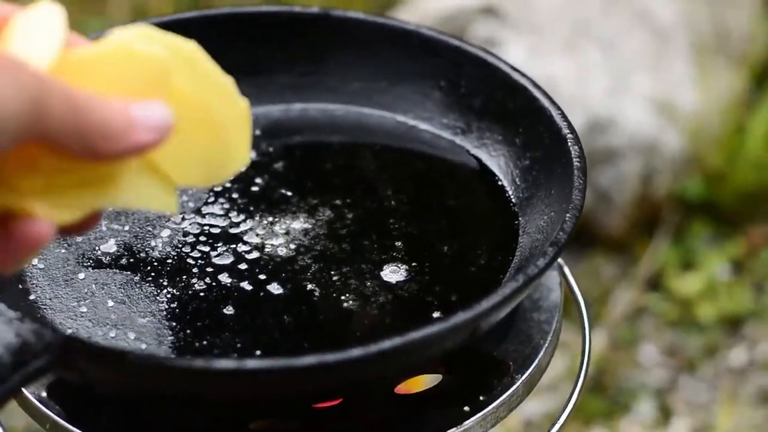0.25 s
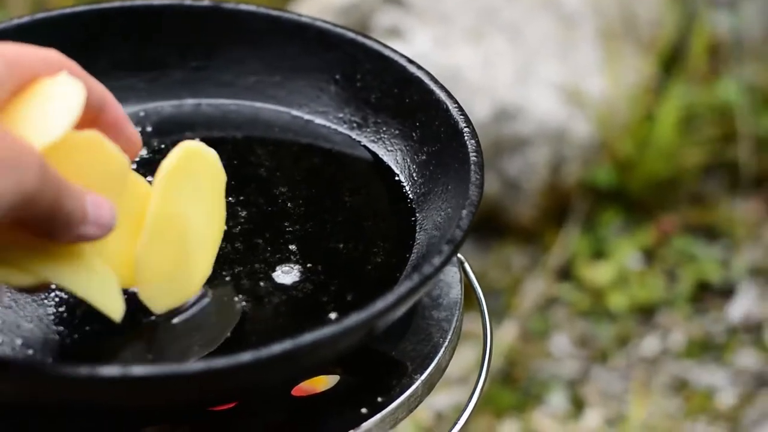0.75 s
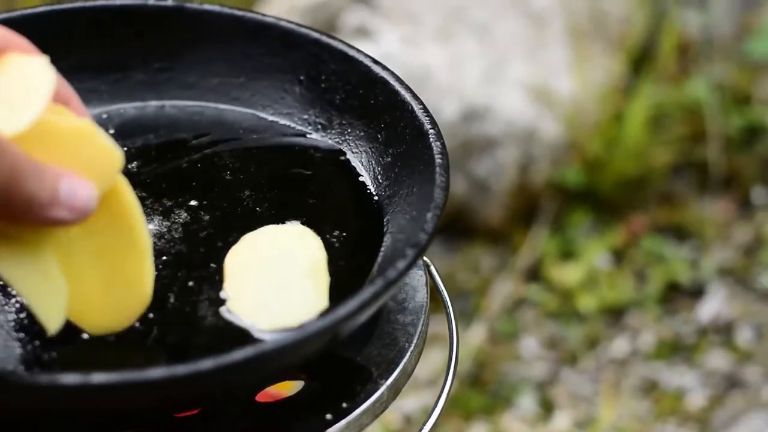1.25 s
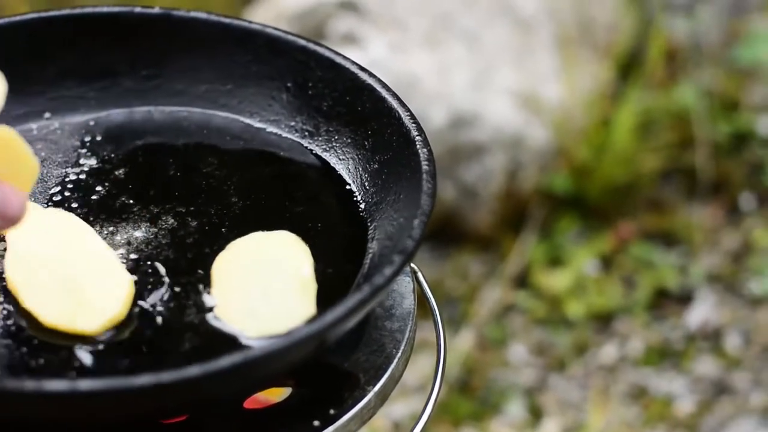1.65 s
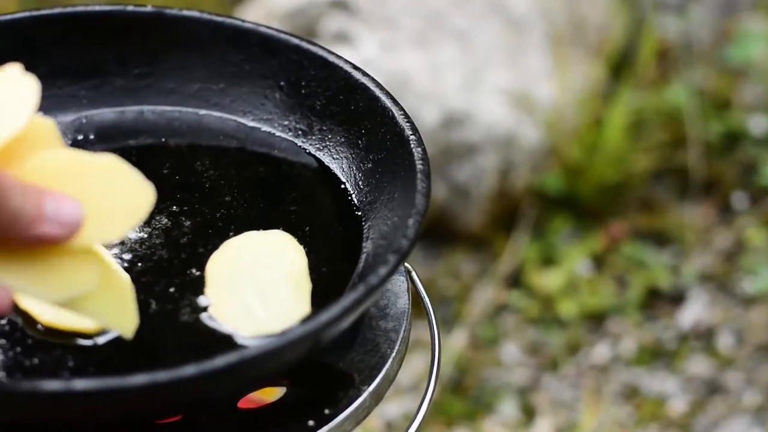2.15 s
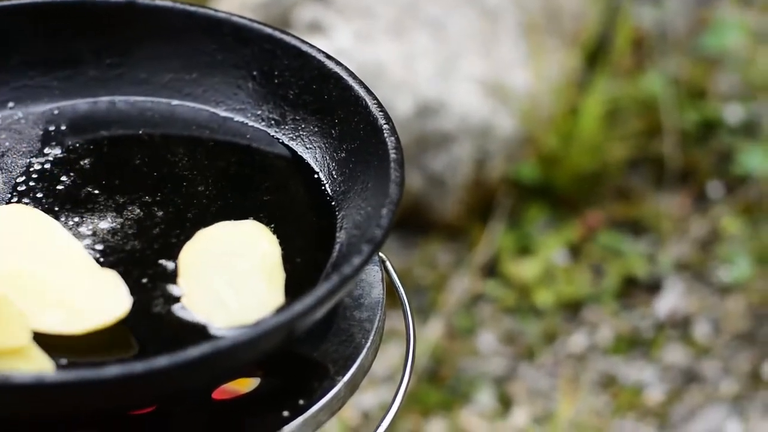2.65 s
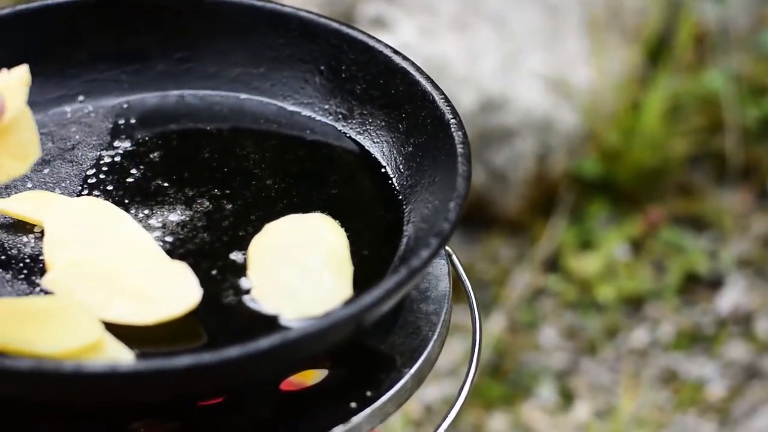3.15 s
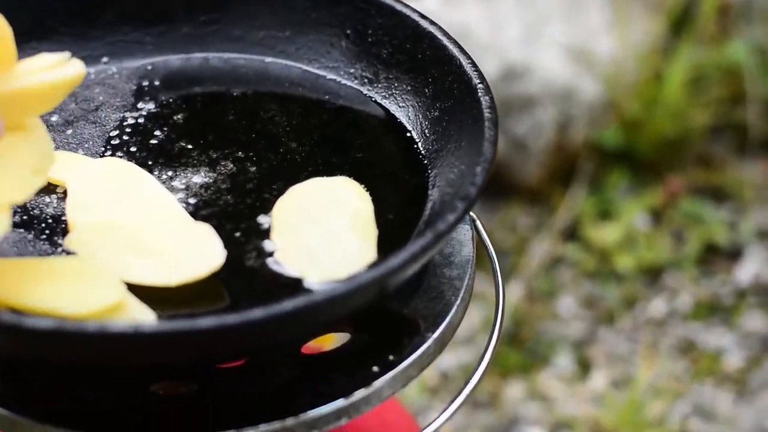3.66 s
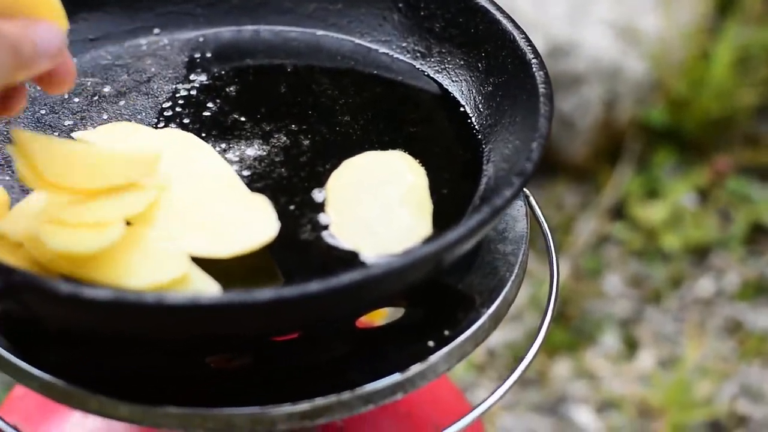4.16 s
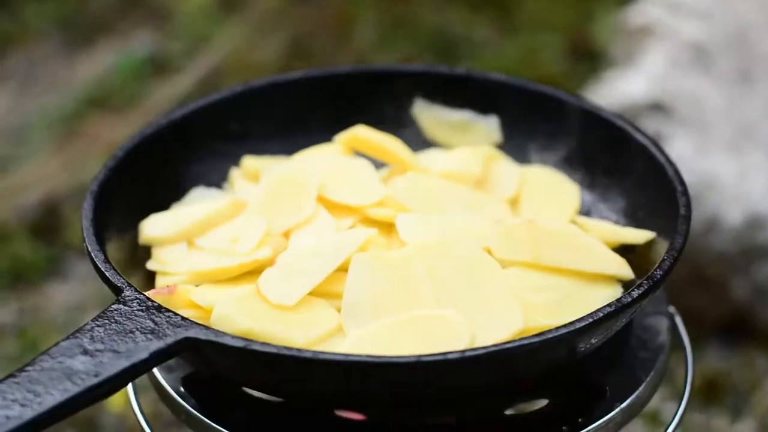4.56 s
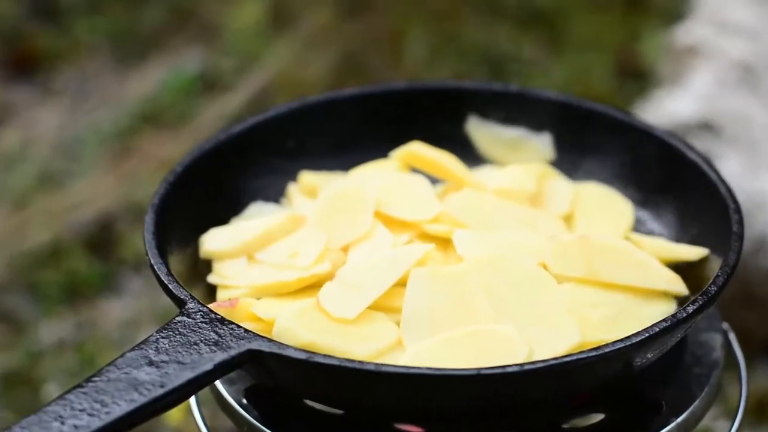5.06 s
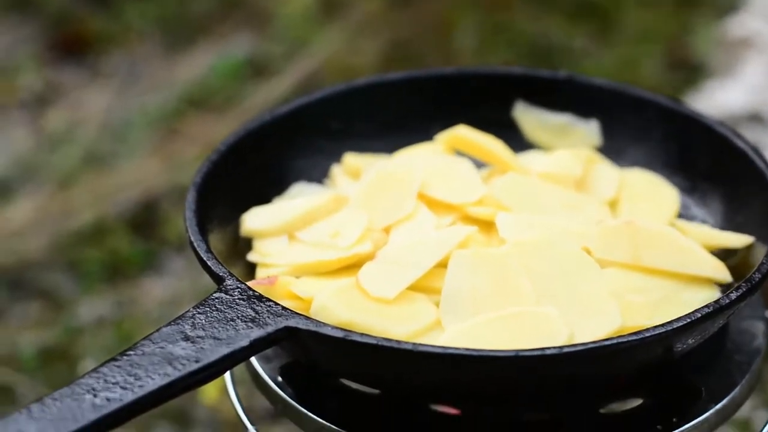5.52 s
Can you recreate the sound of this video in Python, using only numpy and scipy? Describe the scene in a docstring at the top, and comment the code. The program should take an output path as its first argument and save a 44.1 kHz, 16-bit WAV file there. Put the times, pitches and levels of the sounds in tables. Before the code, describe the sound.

A portable gas burner runs outdoors under an iron pan, close to the microphone, in a dry, fairly narrow stereo image leaning slightly right. From 0 s there is a soft roar and bright hiss; the level drops sharply at about 0.04 s and eases back within a few tenths. Narrow, airy whistles around 3 to 11 kHz swell and fade unevenly, dulling near 0.8 s, brighter around 1.3 s, weaker near 2.4 s, strongest around 3.9 s. One very faint bubble tone comes at 1.7 s. At about 4.37 s a fuller, wider burner roar enters abruptly, overlapping the close hiss until that stops at 4.75 s. With it comes dense, fine sizzling of potato slices in oil, with small random crackles and sharp spits, clustered around 4.45 to 4.6 s, 5.0 to 5.5 s and 5.7 s. Small bubbles tick near 4.9 s; a low plop sounds at 5.4 s.

```python
"""A portable gas burner hisses and roars softly outdoors, close to the microphone, under an iron pan.
The gas jet rings the burner's narrow passages, and their high tones swell as the microphone drifts.
The level dips briefly at the start. Late on, a wider sound of the full pan overlaps the close one:
potato slices fizz in the oil, bubbles pop and water drops spit. Flame and fizz are shaped noise and clicks."""
import sys
import numpy as np
from scipy import signal
from scipy.fft import rfft, irfft
from scipy.io import wavfile

SR = 44100
rng = np.random.default_rng(int(sys.argv[2]) if len(sys.argv) > 2 else 0)


def master_out(mix):
    """Clip the mix to full scale and print it as 16-bit PCM to the path in sys.argv[1]."""
    frames = np.transpose(np.atleast_2d(mix))
    ceiling = np.clip(frames, -1, 1)
    pcm = np.round(ceiling * 32767).astype(np.int16)
    wavfile.write(sys.argv[1], SR, pcm)


N = 255339  # length in samples

# when the wider sound of the full pan comes in, and how long it takes to rise
WIDE_START_S, WIDE_ATTACK_S = 4.365, 0.009

# Flame roar and jet hiss close beside the burner, before drift and dip.
# Each row: frequency in Hz, density in dB per Hz.
CLOSE_ROAR = [(22, -128), (55, -105), (125, -91.5), (190, -89), (900, -85.5), (1750, -88), (2200, -84.5),
              (2650, -90), (3700, -94), (4500, -93), (6550, -99), (8000, -95.5), (13200, -99),
              (15700, -93.5)]
# Fainter resonances of the burner, close up, before drift and dip.
# Each row: frequency in Hz, width in Hz, peak density in dB per Hz.
CLOSE_RESONANCES = [(3956, 130, -91.5), (4970, 170, -90), (6850, 150, -87.5), (7480, 260, -87.5),
                    (8100, 560, -90), (10000, 180, -89), (11700, 240, -96), (12600, 370, -99),
                    (14950, 450, -103)]
# Burner tones that swell and fade.
# Each row: frequency in Hz, width in Hz, level relative to its group in dB, group number from 0.
WHISTLES = [(2740, 235, -1, 0), (2994, 150, 0, 0), (3420, 120, 0, 5), (5580, 195, -1, 1), (5916, 49, -5, 1),
            (6138, 110, -4, 2), (6320, 93, -11, 2), (9560, 120, 17.5, 3), (9380, 180, 15.5, 3),
            (10630, 150, 5, 4), (11060, 150, 10, 4)]


def close_burner():
    """Flame roar plus the jet's turbulence ringing in the burner; the whistles swell in groups."""
    flame = noise(spectrum(CLOSE_ROAR)) * flutter(rate_hz=26, depth_db=0.6)
    # the fainter resonances rise a little with the high whistles
    ring = noise(resonances(CLOSE_RESONANCES)) * evened(treble_swell()) ** 0.38
    whistles = np.zeros(N)
    for group, swell in enumerate(whistle_swells()):
        modes = [row for row in WHISTLES if round(row[3]) == group]
        tones = evened(noise(resonances(modes)))
        whistles += swell * tones * flutter(rate_hz=27, depth_db=0.88)
    return (drift(flame + ring) + gain_of(0.4) * whistles) * close_level()


# The swell that the whistles share, beside the burner.
# Each row: time in seconds, level in dB.
TREBLE_SWELL = [(0.3, -2.5), (0.78, -6.5), (0.86, -3.5), (1.02, -2), (1.26, 2), (1.58, 0.5), (1.66, 2),
                (1.82, -0.8), (2.14, -1.3), (2.38, -4.5), (2.54, 0.7), (3.02, -2.0), (3.26, 1.9), (3.42, 1),
                (3.9, 4), (4.36, 1)]


def treble_swell():
    """Gain of the shared swell at every sample, in straight dB lines between the points."""
    seconds, db = np.transpose(TREBLE_SWELL)
    return gain_of(np.interp(np.arange(N) / SR, seconds, db))


# How each group of whistles sounds at the microphone, before the shared swell, flares and final trim.
# Each row: level at the pivot time in dB, response in dB per dB of the shared swell, trend in dB per second.
WHISTLE_GROUPS = [(-50.9, 0.03, 0.5), (-58.2, 0.35, -0.3), (-55.5, 1.4, 0.56), (-57.3, 0.93, -0.4),
                  (-71, 0.74, -0.2), (-58.6, 0.1, -0.1)]
# Moments when one group flares up or sinks by itself.
# Each row: centre in seconds, half length in seconds, change in dB, group number from 0.
WHISTLE_FLARES = [(0.15, 0.25, 6, 2), (0.45, 0.2, 8, 4), (0.64, 0.23, 7.5, 1), (0.7, 0.4, -4, 5),
                  (1.33, 0.15, 4, 5), (1.5, 0.45, 10, 4), (2.05, 0.12, 7, 4), (2.722, 0.18, 10.5, 4),
                  (3.25, 0.25, 3.5, 3), (3.95, 0.5, 12, 4)]


def whistle_swells(trend_pivot_s=2.3):
    """Gain of each group: one shared swell, followed more or less closely, a trend and single flares."""
    t = np.arange(N) / SR - trend_pivot_s
    treble = treble_swell()
    swells = [gain_of(db + trend * t) * treble ** follow for db, follow, trend in WHISTLE_GROUPS]
    for centre_s, half_length_s, db, group in WHISTLE_FLARES:
        flare = gain_of(db * bump(centre_s, half_length_s))
        swells[round(group)] = swells[round(group)] * flare
    return swells


def drift(x, depth_db=2.0, patch_hz=260, patch_s=0.048):
    """As the microphone moves, echoes from pan and stove reinforce shifting patches of the treble."""
    hz, seconds, cells = signal.stft(x, SR, nperseg=1024, noverlap=768)
    # random field over frequency and time, smoothed to the size of one patch
    across = np.fft.fftfreq(len(hz), hz[1])[:, None]
    along = np.fft.fftfreq(len(seconds), seconds[1])
    smooth = np.exp(-(across * patch_hz * np.pi) ** 2 - (along * patch_s * np.pi) ** 2)
    rough = rng.standard_normal(cells.shape)
    field = evened(np.fft.ifft2(np.fft.fft2(rough) * smooth).real)
    # short waves shift most: the full depth is reached from 10 kHz up
    share = np.minimum(hz[:, None] / 10000, 1) ** 1.1
    cells = cells * gain_of(depth_db * field * share)
    return signal.istft(cells, SR, nperseg=1024, noverlap=768)[1][:N]


def close_level(dip_s=0.0435, dip_db=-24.5, recovery_s=0.163, sink_db=-2, end_s=4.735, release_s=0.02):
    """Gain of the close sound: an abrupt dip that eases back, a hold, a slight sinking, a quick release."""
    dip = dip_db * bump(dip_s, recovery_s) * ramp(dip_s, 0.001)
    sink = sink_db * ramp(WIDE_START_S, end_s - WIDE_START_S)
    return gain_of(dip + sink) * (1 - ramp(end_s, release_s))


# Flame roar under the full pan, heard from farther off, before the wider sound's level.
# Each row: frequency in Hz, density in dB per Hz.
WIDE_ROAR = [(22, -112), (60, -95.5), (125, -84), (270, -85), (400, -86), (900, -81), (1700, -81.5),
             (2500, -82), (3700, -88), (5300, -88), (6500, -91.5), (8200, -91.5), (12500, -90.5),
             (15700, -98)]
# Resonances heard from that distance, before the wider sound's level.
# Each row: frequency in Hz, width in Hz, peak density in dB per Hz.
WIDE_RESONANCES = [(275, 60, -85), (1200, 140, -82.5), (3070, 170, -78.5), (3420, 110, -86),
                   (5400, 160, -91), (6000, 155, -80.5), (6800, 85, -87), (7400, 150, -86),
                   (8100, 430, -91), (8750, 200, -95), (9600, 120, -83)]


def wide_burner():
    """From farther off the flame's turbulence is fuller, with its own steady resonances."""
    flame = noise(spectrum(WIDE_ROAR)) * flutter(rate_hz=34, depth_db=1.32)
    return (flame + noise(resonances(WIDE_RESONANCES))) * wide_level()


def wide_level(start_db=-1.6, rise_db_per_s=0.7):
    """Gain of the wider burner sound: a quick attack, then a slow rise."""
    since_start = np.arange(N) / SR - WIDE_START_S
    return gain_of(start_db + rise_db_per_s * since_start) * ramp(WIDE_START_S, WIDE_ATTACK_S)


# Colour of the tiny steam bubbles in the full pan.
# Each row: frequency in Hz, relative level in dB.
FIZZ_COLOUR = [(1500, -24), (4000, 1.5), (6500, 0.5), (8300, 8), (10300, -0.5), (13000, -4), (14600, 8),
               (16000, 6)]
# The largest water drops bursting in the oil; they stir the fizz and also snap by themselves.
# Each row: start of the snap in seconds, strength in dB (the snap peaks 4 dB above it).
LARGE_SPITS = [(4.455, -25), (4.5732, -27), (4.5899, -27), (4.6137, -24), (4.976, -29), (5.1349, -29),
               (5.1829, -30), (5.2918, -26.5), (5.4203, -29), (5.4964, -26), (5.6554, -32), (5.6824, -25),
               (5.697, -26)]


def sizzle(bubbles_per_s=3400, spread_db=4.5, fizz_db=-49, flurry_db=-24, flurry_s=0.039):
    """Thousands of tiny bubbles click open each second; the fizz boils up around each large spit."""
    # a few bubbles are much larger than the rest
    size = gain_of(spread_db * np.minimum(rng.exponential(1, N), 4))
    sign = rng.choice([-1, 1], N)
    opens = rng.random(N) < bubbles_per_s / SR
    clicks = size * sign * opens * flutter(rate_hz=54, depth_db=0.8)
    fizz = evened(irfft(rfft(clicks) * spectrum(FIZZ_COLOUR), N))
    # flurries follow the strength of their spit and add to the steady fizz as power
    flurries = sum(gain_of(db + flurry_db) ** 2 * bump(s, flurry_s) for s, db in LARGE_SPITS)
    return fizz * np.sqrt(gain_of(fizz_db) ** 2 + flurries) * ramp(WIDE_START_S, WIDE_ATTACK_S)


def spits(snap_hz=10500, scatter_s=0.001, scatter_db=-22, level_db=4.0):
    """Each bursting drop is a snap of a single cycle, scattered briefly by the pan wall."""
    out = np.zeros(N)
    t = np.arange(SR // 100) / SR
    for s, db in list(LARGE_SPITS) + small_spits():
        phase = 2 * np.pi * snap_hz * rng.uniform(0.99, 1.1) * t - np.pi
        snap = -phase * np.exp((1 - phase ** 2) / 2)
        bright_noise = evened(np.diff(rng.standard_normal(len(t) + 1)))
        scatter = bright_noise * np.exp(-t / scatter_s)
        add(out, s, gain_of(db + level_db) * (snap + gain_of(scatter_db) * scatter))
    return out


def small_spits(per_s=14, strength_db=-34, spread_db=2.0):
    """Smaller drops burst at random in the full pan: start in seconds, strength in dB."""
    chance = rng.random(N)
    db = strength_db + spread_db * rng.standard_normal(N)
    at = np.flatnonzero(chance < ramp(WIDE_START_S, WIDE_ATTACK_S) * per_s / SR)
    return list(zip(at / SR, db[at]))


# Larger bubbles and a plop from under the slices.
# Each row: centre in seconds, peak level in dB, pitch in Hz, length in seconds.
BUBBLES = [(1.709, -52, 1256, 0.027), (4.886, -32.5, 4100, 0.001), (4.9455, -35, 4700, 0.0013),
           (5.386, -47, 1310, .016), (5.3999, -39.5, 563, 0.0045), (5.4, -41, 298, 0.0058),
           (5.4215, -38, 5000, .0013)]


def bubbles():
    """Pockets of steam ring as they escape: short tones that swell and fade smoothly."""
    out = np.zeros(N)
    for s, db, hz, length in BUBBLES:
        t = np.arange(-2 * length, 2 * length, 1 / SR)
        envelope = np.exp(-(2 * t / length) ** 2)
        add(out, s + t[0], gain_of(db) * envelope * np.cos(2 * np.pi * hz * t))
    return out


def gain_of(db):
    """Decibels to amplitude."""
    return 10 ** (np.asarray(db) / 20)


def evened(x):
    """Scales to an rms of 1."""
    return x / np.sqrt(np.mean(x ** 2) + 1e-20)


def spectrum(points):
    """Gain at every frequency from (Hz, dB) points, joined along log frequency."""
    f, db = np.transpose(points)
    bins = np.fft.rfftfreq(N, 1 / SR)
    return gain_of(np.interp(np.log(bins + 1), np.log(f), db))


def resonances(modes):
    """Gain at every frequency of a set of steep-sided resonances, added as power."""
    f = np.fft.rfftfreq(N, 1 / SR)
    power = 0
    for hz, width, db, *_ in modes:
        peak = gain_of(db) / (1 + ((f - hz) / width) ** 2 * np.sqrt(2))
        power = power + peak ** 2
    return np.sqrt(power)


def noise(shape):
    """Turbulence with the given amplitude per root hertz."""
    return irfft(rfft(rng.standard_normal(N)) * shape, N) * np.sqrt(SR / 2)


def flutter(rate_hz, depth_db):
    """A random gain that wavers mostly below the given rate, with an rms depth in dB."""
    slow = 1 / (1 + (np.fft.rfftfreq(N, 1 / SR) / rate_hz) ** 2)
    return gain_of(depth_db * evened(noise(slow)))


def ramp(start_s, length_s):
    """Rises from 0 to 1 in a straight line."""
    return np.clip((np.arange(N) / SR - start_s) / length_s, 0, 1)


def bump(centre_s, width_s):
    """A smooth arch of height 1."""
    return np.exp(-((np.arange(N) / SR - centre_s) / width_s) ** 2)


def add(mix, s, sound):
    """Mixes a sound in at time s."""
    part = mix[max(round(s * SR), 0):][:len(sound)]
    part += sound[:len(part)]


# Stereo width of the whole sound, before the overall side level.
# Each row: frequency in Hz, side minus mid in dB.
WIDTH = [(60, -15), (700, -11), (1400, -22), (2800, -28), (4400, -58), (5200, -25), (5800, -1.5),
         (6700, -34), (9500, -42), (11800, -10), (13500, -4), (14800, -5), (15700, -18)]
# Stereo balance, which leans slightly right in most of the range.
# Each row: frequency in Hz, left minus right in dB.
LEAN = [(60, -0.5), (500, -2), (1100, 1), (8000, -1.9), (13000, 1)]


def scene(side_db=-6.0):
    """All sounds share one place, leaning slightly right in most of the range; no long echo is added."""
    mid = rfft(close_burner() + wide_burner() + sizzle() + spits() + bubbles())
    # a short random smear of the sound gives the stereo width, frequency by frequency
    t = np.arange(SR // 20) / SR
    smear = rng.standard_normal(len(t)) * np.exp(-t / 0.0062)
    smear = smear / np.linalg.norm(smear)
    side = gain_of(side_db) * mid * spectrum(WIDTH) * rfft(smear, N)
    lean = np.sqrt(spectrum(LEAN))  # half of the difference on each channel
    left = irfft((mid + side) * lean, N)
    right = irfft((mid - side) / lean, N)
    return np.array([left, right])


def record(dry, edge_hz=15780):
    """The recorder's steep band limit."""
    lowpass = signal.firwin(1023, edge_hz, window=("kaiser", 8), fs=SR)
    return signal.oaconvolve(dry, lowpass[None], "same")


dry = scene()
out = record(dry)
master_out(out)
```